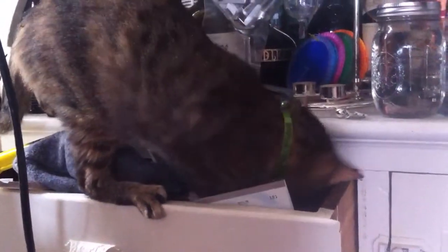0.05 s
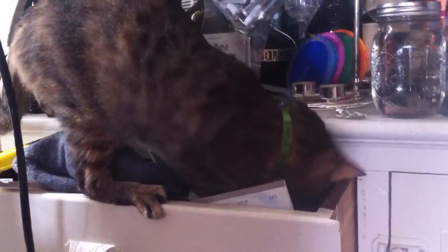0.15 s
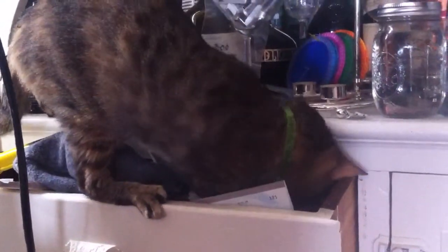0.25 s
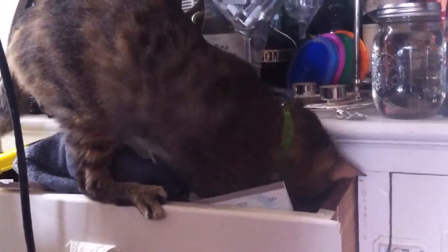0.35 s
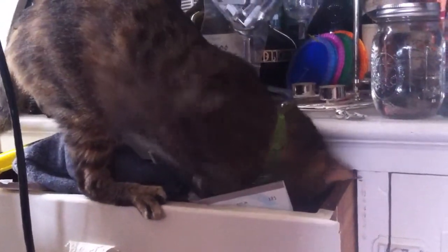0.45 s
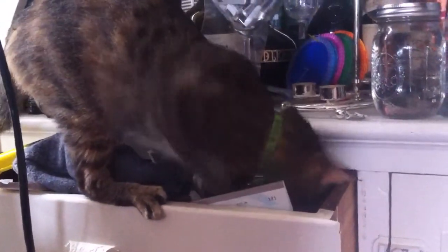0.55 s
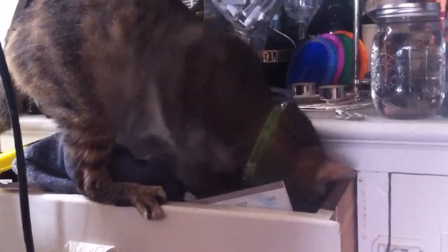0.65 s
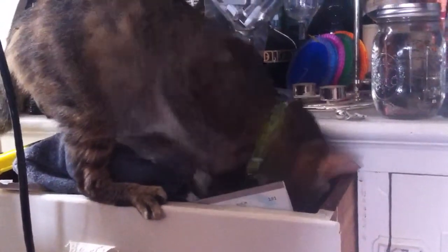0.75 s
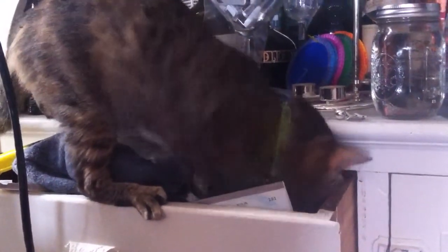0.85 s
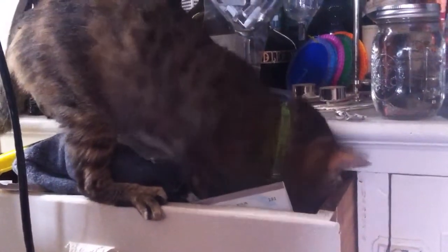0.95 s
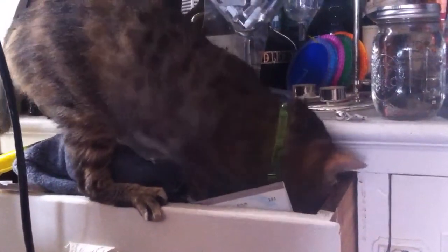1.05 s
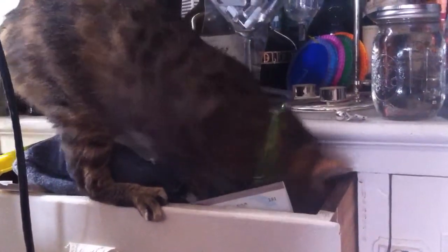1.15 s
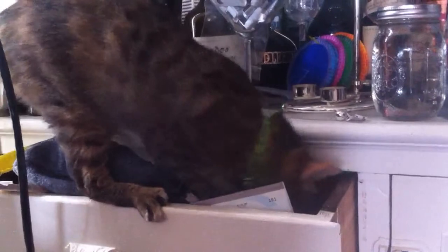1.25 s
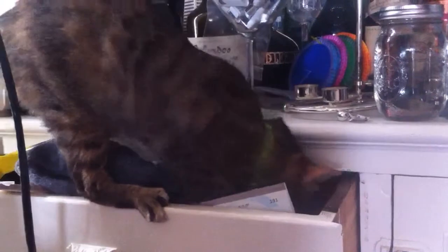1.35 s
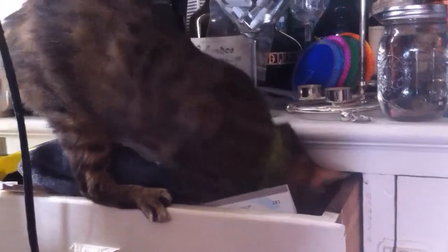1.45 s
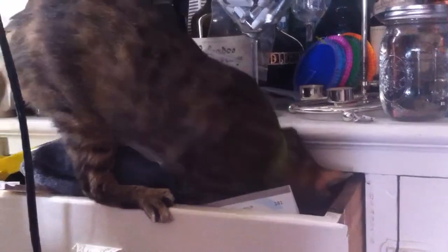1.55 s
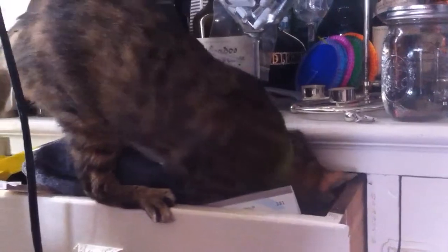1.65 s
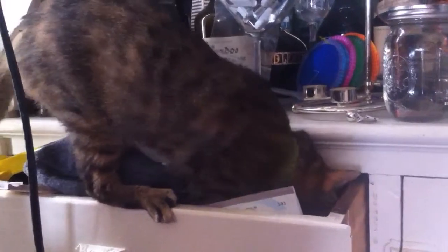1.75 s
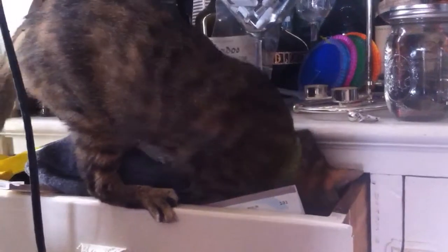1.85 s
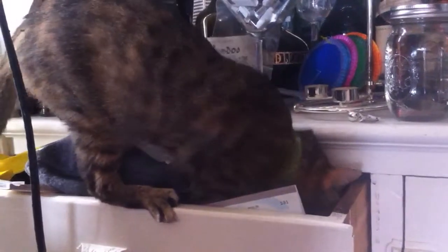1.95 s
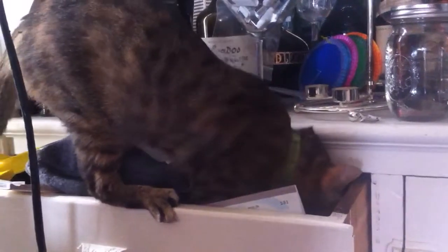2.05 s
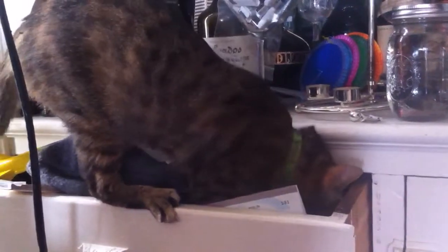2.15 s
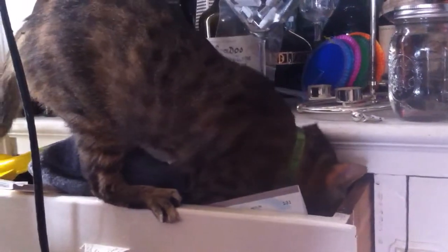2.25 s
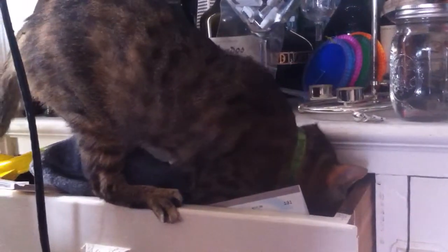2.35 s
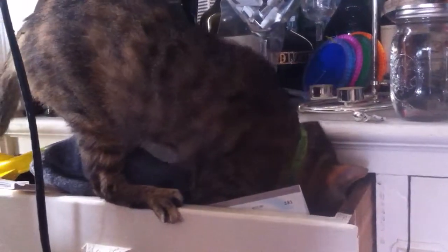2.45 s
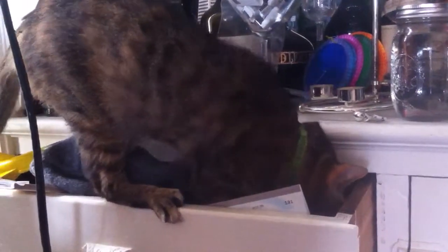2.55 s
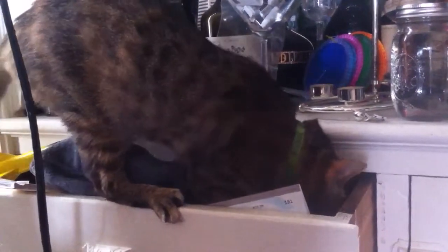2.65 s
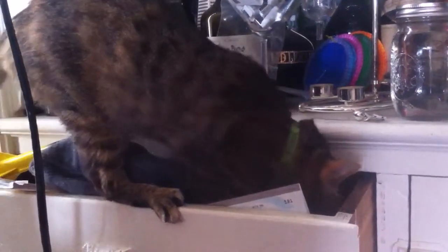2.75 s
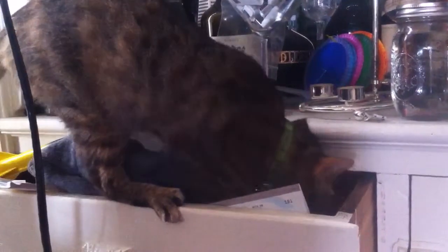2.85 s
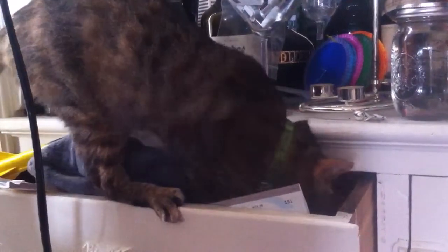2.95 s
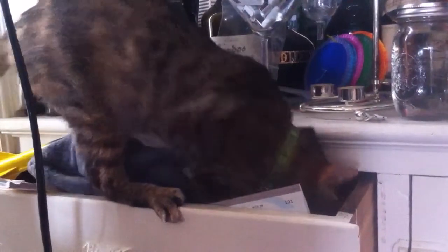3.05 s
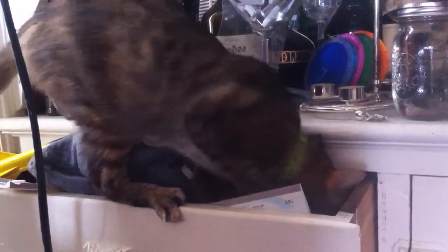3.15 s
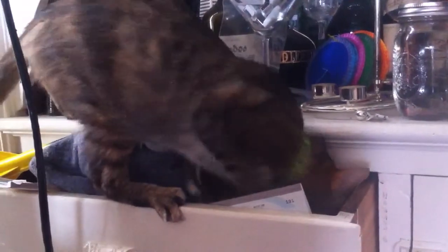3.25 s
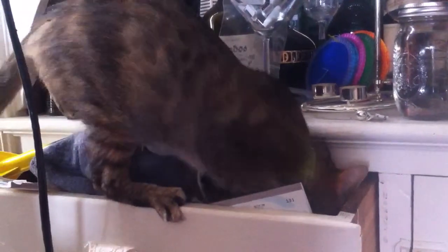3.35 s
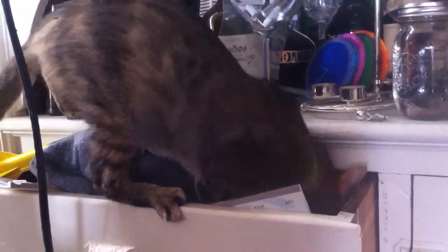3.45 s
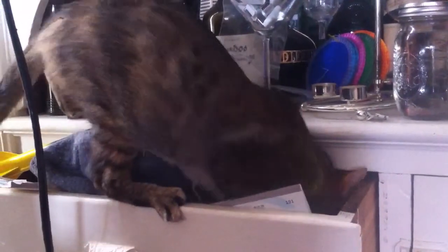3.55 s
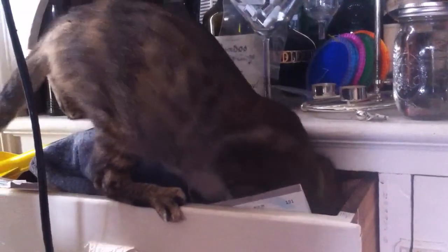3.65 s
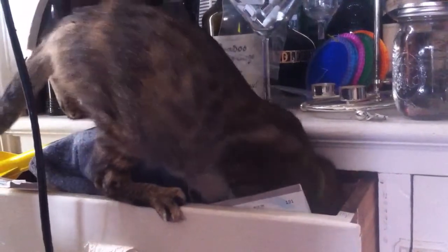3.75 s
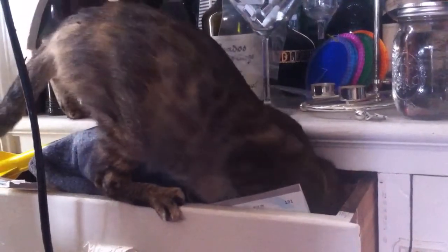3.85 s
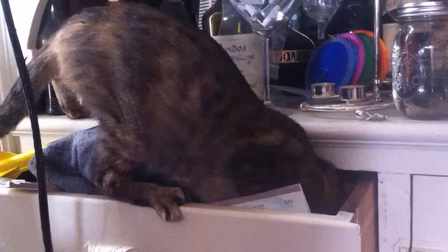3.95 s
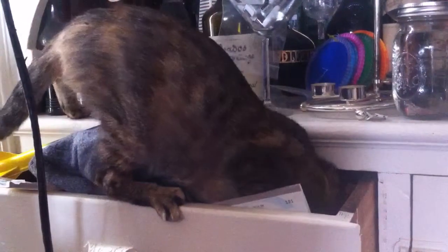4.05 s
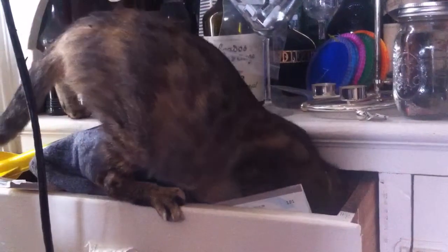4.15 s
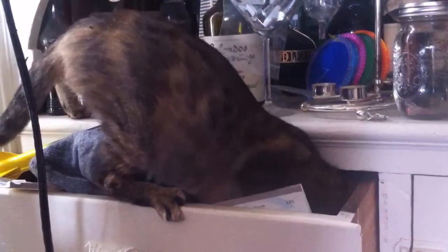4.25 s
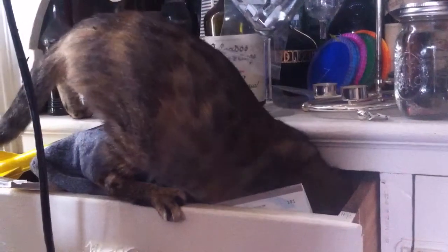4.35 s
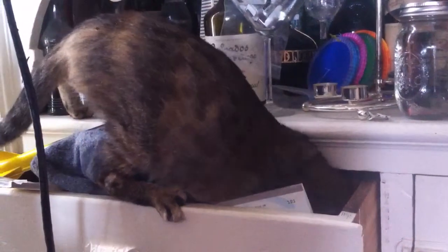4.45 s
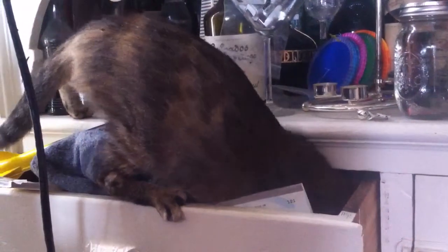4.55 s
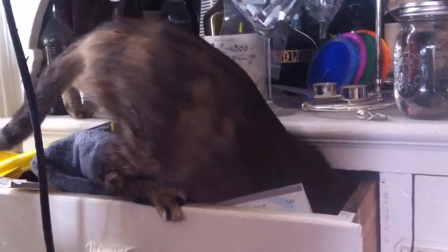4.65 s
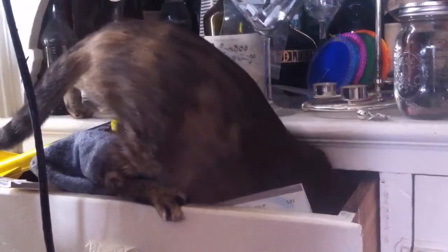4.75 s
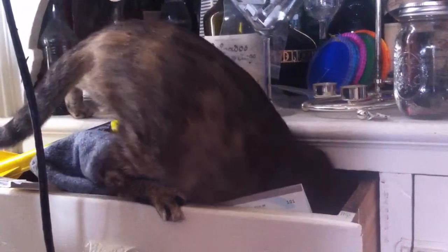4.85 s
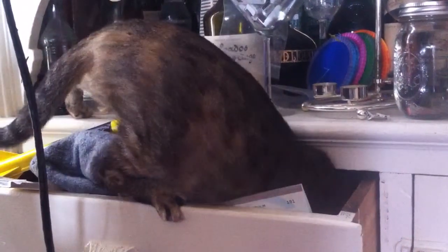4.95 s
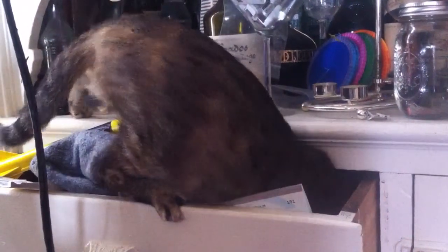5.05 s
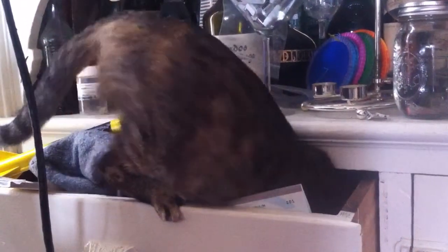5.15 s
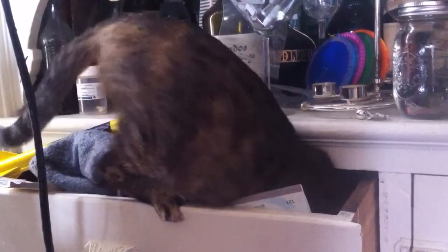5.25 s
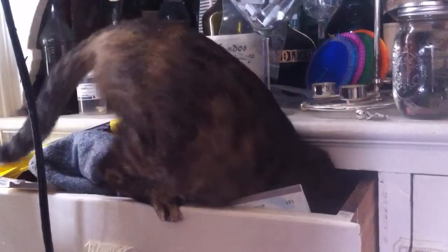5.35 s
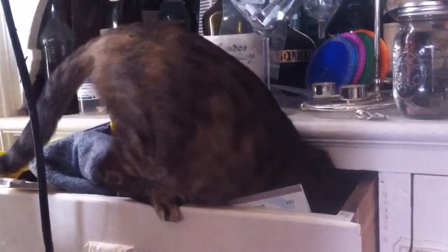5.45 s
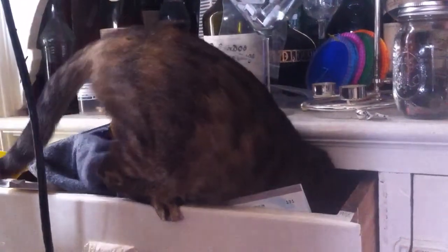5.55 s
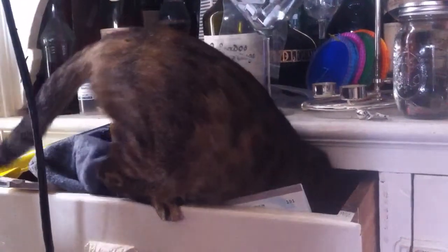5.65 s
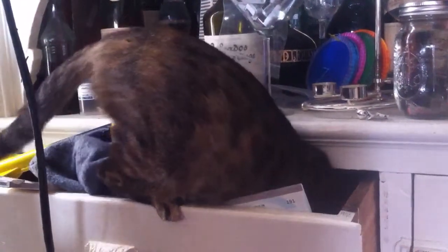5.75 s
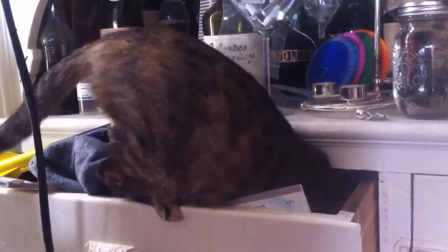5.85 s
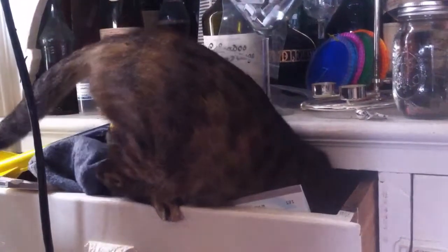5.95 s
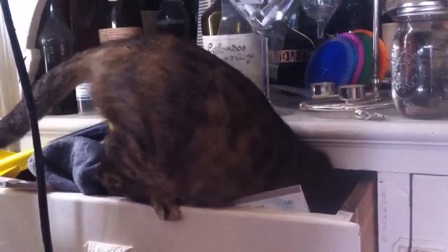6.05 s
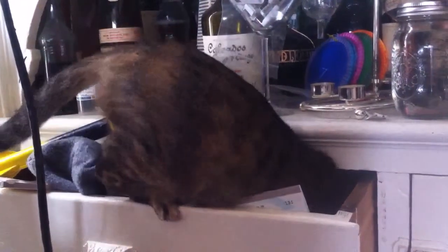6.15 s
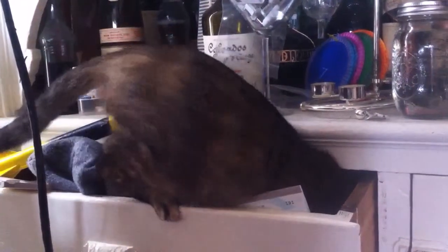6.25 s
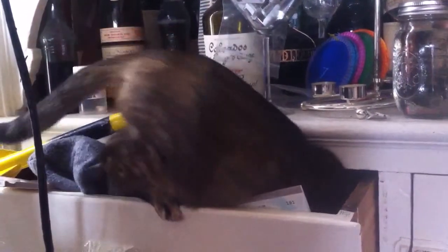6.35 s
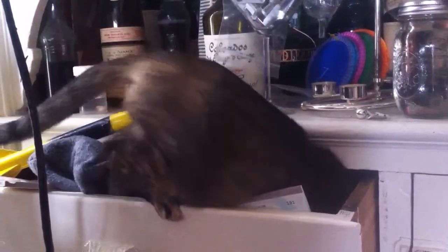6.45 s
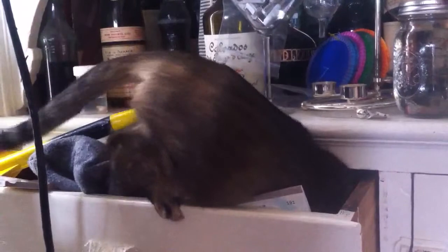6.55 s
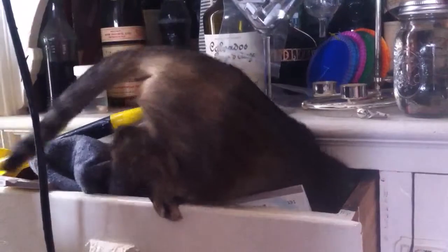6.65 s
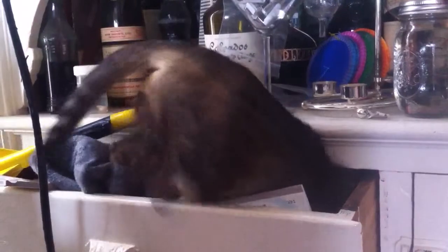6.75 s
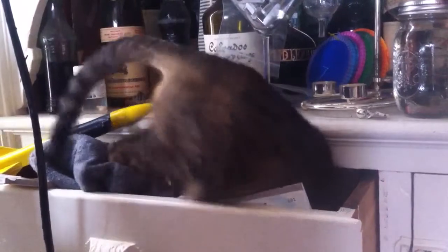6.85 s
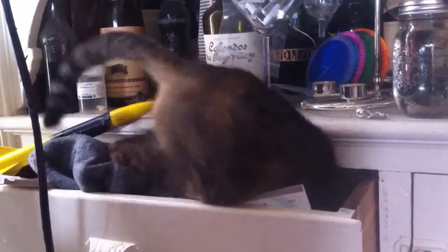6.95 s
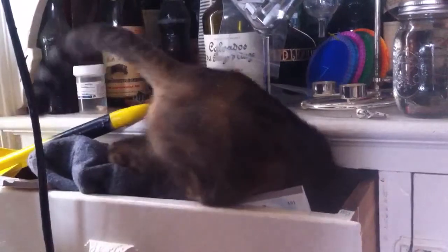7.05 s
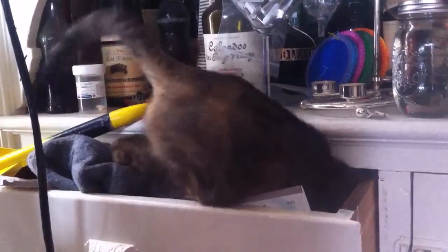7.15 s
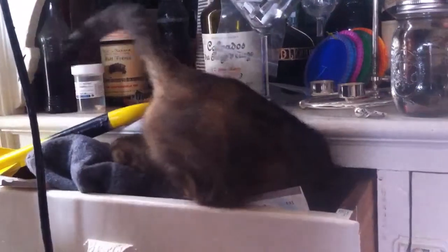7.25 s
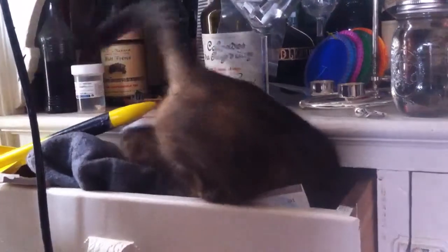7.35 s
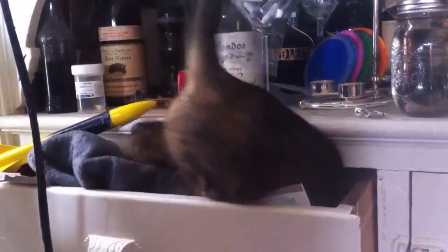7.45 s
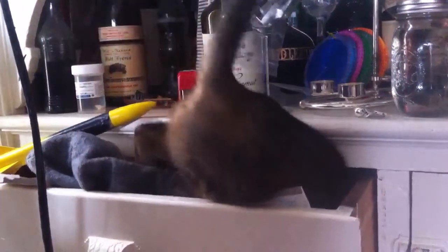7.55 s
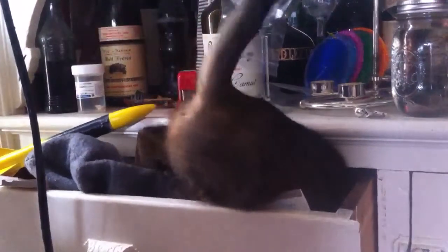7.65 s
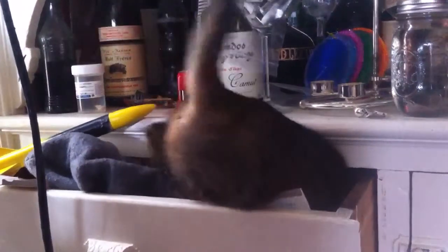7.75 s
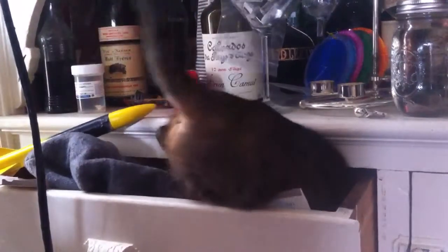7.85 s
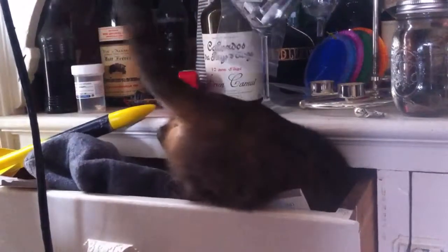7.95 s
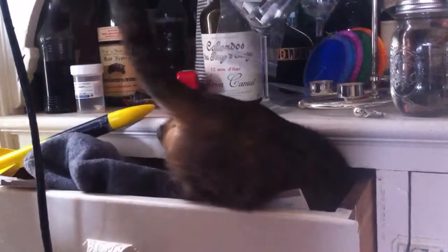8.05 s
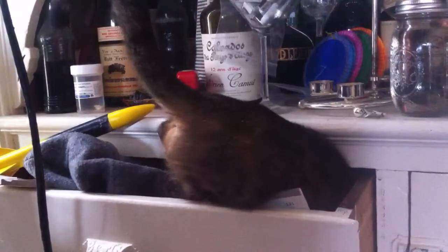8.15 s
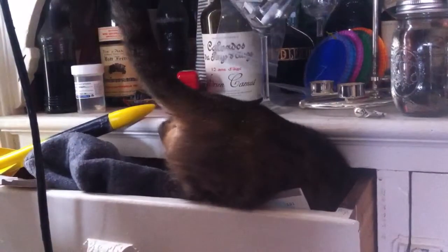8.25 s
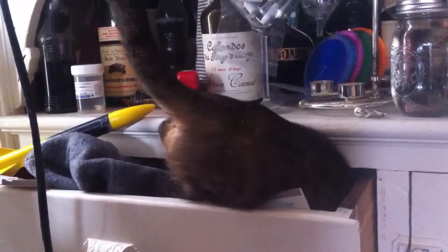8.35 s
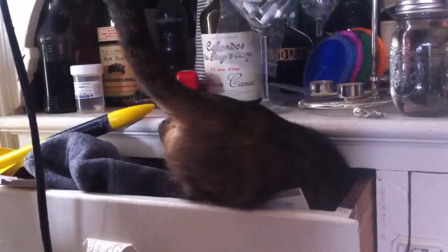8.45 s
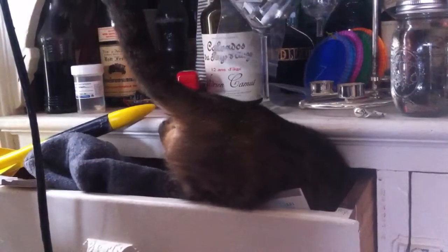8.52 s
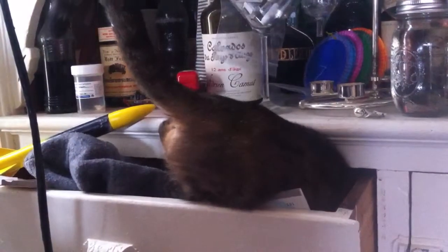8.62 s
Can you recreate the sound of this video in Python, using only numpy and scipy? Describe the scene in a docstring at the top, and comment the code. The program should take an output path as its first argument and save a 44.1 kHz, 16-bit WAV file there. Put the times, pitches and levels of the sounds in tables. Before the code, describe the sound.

Busy paper rustling and claw scratches in a drawer, a bouncing wooden knock, a quiet lull, then muffled paw thumps as a cat climbs in.

```python
"""In a quiet room with a humming appliance, a cat digs in an open wooden drawer of papers and cloth, then climbs in.
Claws and drags are bursts of paper noise that also shake two resonant panels; something hard knocks and bounces.
Soft paws thump the resonant drawer bottom, a few times early and most often near the end.
Uneven noise makes the rustle and creak, a wavering sine over coloured noise the hum and air;
decaying noise makes the room's answer to the contacts."""
import sys
import numpy as np
from scipy import signal
from scipy.fft import rfft, irfft, next_fast_len
from scipy.io import wavfile
from scipy.ndimage import map_coordinates

SR = 44100
rng = np.random.default_rng(int(sys.argv[2]) if len(sys.argv) > 2 else 0)


def store_pcm(level_fs):
    """Save levels as 16-bit WAV."""
    pcm = np.round(np.clip(level_fs, -1, 1) * 32767).astype(np.int16)
    wavfile.write(sys.argv[1], SR, np.atleast_2d(pcm).T)


N = 382947  # samples

# In the event tables, levels are nominal: each layer adds its own offset in dB.
# Paper and creak under the strokes. Each row: time in seconds, paper level in dB, panel creak level in dB.
STIRRING = [(0, -46, -56.5), (.3, -66.5, -59), (.5, -46, -58.5), (.8, -62, -69), (1.0, -57, -54.5),
            (1.3, -60, -57.5), (1.8, -79, -66.5), (2.3, -66, -61), (3.1, -56.5, -59.5), (3.2, -74, -74),
            (3.9, -82, -71), (4.5, -79, -65.5), (4.8, -86, -77), (5.8, -81, -81), (6.1, -72, -66.5),
            (6.5, -77.5, -71.5), (7.3, -68, -65), (7.55, -69, -63), (8.1, -79, -78), (8.68, -86, -71)]
# Sliding paper and fur. Each row: frequency in Hz, relative density in dB per Hz.
SLIDE_SPECTRUM = [(410, -14), (700, -11.5), (875, -11), (1330, -5), (2100, -3.5), (2430, -3), (9600, -18.5),
                  (16000, -64)]
# Crackling paper. Each row: frequency in Hz, relative density in dB per Hz.
PAPER_SPECTRUM = [(500, -9), (1000, 4.5), (1700, 6.5), (2500, 5), (4000, 2), (6000, -5.5), (9000, -13)]
# Fizz of dry edges. Each row: frequency in Hz, relative density in dB per Hz.
EDGE_SPECTRUM = [(3000, -25), (5000, 0), (6500, 0), (9000, -3), (13000, -8.5), (16500, -18)]
# Resonances of the side panel. Each row: centre in Hz, width in Hz, strength in dB.
SIDE_PANEL = [(482, 160, -8), (539, 79, -2.5), (612, 18, -3.5), (689, 75, -1), (800, 25, 1)]
# Resonances of the back panel. Each row: centre in Hz, width in Hz, strength in dB.
BACK_PANEL = [(815, 47, -3), (873.6, 44, 3), (1048, 103, -3)]
# Resonances of the drawer bottom. Each row: centre in Hz, width in Hz, strength in dB.
BOTTOM_BOARD = [(140, 17, -20), (172, 16, 12), (240, 41, 16), (350, 160, 14), (445, 115, -4)]
# Room air and microphone hiss. Each row: frequency in Hz, relative density in dB per Hz.
AIR_SPECTRUM = [(25, -22), (60, -19), (90, -14.5), (130, -5), (200, 7), (260, 0), (400, -3), (750, -8.5),
                (1200, -12), (1600, -16.5), (3000, -20), (8000, -23), (16000, -25)]
# Claws flicking paper. Each row: start in seconds, level in dB, share in the panels in dB, treble in dB,
# colour in Hz.
CLAW_FLICKS = [(.02, -36, -9, -7.5, 4850), (.07, -32, -5, -4.5, 2240), (0.208, -48.5, 3, -24, 1560),
               (0.308, -39.5, -20, -3, 1370), (.422, -25.5, -8.5, -5.5, 4370), (.476, -41.5, 1, -2, 3230),
               (0.529, -30.5, -10, -4, 3440), (.772, -43.5, -4.5, -2.5, 5030), (.851, -44.5, 2, 0.5, 1180),
               (0.927, -36.5, -25, -5.5, 2610), (.982, -29.5, -14, -11.5, 2320),
               (1.034, -26.5, -11, -4, 2400), (1.186, -39, 2.5, -13, 1650), (1.224, -33, -7.5, -11.5, 1210),
               (1.324, -43, -6, -12, 2150), (1.357, -38.5, -12, -10, 4050), (1.413, -30, -3, -5.5, 1680),
               (1.474, -27.5, -13, -7.5, 4300), (1.495, -39, -3, -4, 2190), (1.628, -32, -5.5, -5, 2670),
               (1.853, -31.5, -5.5, -27, 2900), (2.182, -42, 1, -10, 2320), (2.331, -42, -6, -22, 1830),
               (2.489, -33.5, -9, -4.5, 3070), (2.593, -33, -9, -4.5, 3000), (2.658, -33, -2, -8.5, 1950),
               (2.708, -44.5, -2, -23, 2970), (2.782, -41.5, -5.5, -9, 3100), (2.908, -41, -3, 0, 1350),
               (3.042, -38, -2, -13, 1380), (3.113, -41.5, -8, -2.5, 2140), (3.375, -32, -14, -1, 3520),
               (5.183, -62.5, 5, 8, 1350), (5.932, -59, -10, -5, 2880), (6.07, -65, -6, -1, 2920),
               (6.111, -49, 0.5, -15, 1320), (6.176, -54.5, -7, -18, 1210), (7.093, -54, 1, -4, 2960)]
# Decay of the room. Each row: frequency in Hz, time to fall 60 dB in seconds.
ROOM_DECAY = [(150, 0.8), (600, 0.58), (3000, 0.69), (12000, 0.43)]
# Paws on the drawer bottom. Each row: start in seconds, level in dB.
PAW_THUMPS = [(0.082, -40), (.425, -39.5), (2.186, -44.5), (6.5, -54.5), (6.588, -51), (6.692, -48.5),
              (6.748, -53.5), (7.136, -29), (7.345, -36.5), (7.379, -44.5), (7.635, -41), (7.74, -33.5),
              (8.068, -42.5)]
# Drags that swell, hold and fade. Each row: start in seconds, level in dB, share in the panels in dB,
# treble in dB, colour in Hz, rise in seconds.
CLAW_DRAGS = [(0.337, -41.5, -1, -15, 1640, 0.0081), (.489, -43, -23, -3.5, 2470, 0.0069),
              (.615, -42.5, -5, -6, 2520, 0.0059), (.636, -40, -3, -8, 2780, 0.002),
              (0.882, -42, -8.5, -9, 3520, 0.0067), (.943, -34.5, -19, -22, 2170, 0.0017),
              (1.119, -33.5, -9, -9, 1430, 0.0042), (1.243, -38, -8, -11, 2350, 0.006),
              (1.446, -41, -1, -22, 1180, 0.0095), (2.162, -49, -26, -15, 2580, 0.0066),
              (2.304, -45, -1, -6.5, 1250, 0.0096), (2.389, -41, -5, -10, 3400, 0.0043),
              (2.564, -41, -11, -15, 3030, 0.0061), (2.883, -41, -11.5, -12, 3040, 0.0087),
              (2.997, -42.5, -8.5, -11, 3660, .013), (3.095, -51, -3, -13, 1350, .004),
              (3.294, -55.5, -6, -3, 4850, 0.011), (3.325, -52.5, -4, -11, 3570, 0.0075),
              (3.66, -58, 3, -15, 1210, 0.0059), (3.73, -57.5, -2, -12, 1210, 0.0069),
              (4.334, -58, 5, -23, 1210, 0.0034), (4.55, -69, -4, 3, 1210, .0058),
              (6.46, -61.5, -3, -8, 2860, .0028), (6.846, -52.5, -5.5, 5, 2700, 0.011),
              (7.057, -56, -1, -14, 1410, 0.014), (7.289, -53, -1, -9, 1250, 0.0067),
              (7.609, -40, 0.5, -10, 3850, 0.006), (7.629, -31, -3, -11, 1580, 0.0025),
              (7.657, -49, -4, -12, 2200, .006)]
# Loose things knocking on wood. Each row: start in seconds, crack level in dB, side panel relative to it in dB,
# back panel relative to it in dB.
WOOD_KNOCKS = [(.371, -40, 4.5, 1.5), (1.375, -59, 15.5, -10), (1.42, -47, 12, -6), (1.673, -42, -3, 0.5),
               (1.693, -37.5, -7, 0), (1.8, -64.5, 18.5, 8), (1.889, -49, 8.5, 9), (1.9, -48.5, 7, 11),
               (1.935, -34, -15, 2), (1.941, -44, -6, 14.5), (1.96, -43.5, 15, 11), (1.975, -50, -2, -1),
               (1.991, -34.5, -10, 2.5), (2.021, -54, 15, -6), (2.047, -36.5, 5.5, 11),
               (2.381, -40, -4, 2.5), (3.355, -29, 6, 3), (3.389, -36, 18.5, 3), (3.409, -36.5, -1, 7.5),
               (3.449, -35, 9, 7), (3.477, -53, 7, 19.5), (3.483, -52.5, 25, 3), (3.543, -47, 9.5, -9),
               (3.892, -59.5, 5, 4), (4.029, -55, 7, 9.5), (4.277, -65, 4, 11), (4.408, -65, 7, 12),
               (4.441, -56, 6, 11), (4.479, -64, 18.5, 17.5), (4.73, -68, 23, 21), (4.897, -64, 14.5, 14),
               (6.012, -72, 15, 0), (6.224, -58.5, -3, 6), (6.275, -62, 10, 6), (7.137, -49, 14, 6),
               (7.347, -53, 15, 7)]


def amp(db):
    """Decibel law: the amplitude gain of a level in dB."""
    return 10 ** (np.asarray(db) / 20)


def unit(x):
    """Normalisation of power: x scaled to rms 1."""
    return x / np.sqrt(np.mean(x ** 2) + 1e-20)


def along(points, hz):
    """Interpolation of (Hz, value) points on a logarithmic frequency axis."""
    f, v = np.transpose(points)
    return np.interp(np.log(hz + 1), np.log(f + 1), v)


def wobble(rate):
    """Band-limited fluctuation: a smooth random curve with rate knots a second."""
    knots = rng.standard_normal(int(N * rate / SR) + 4)
    return map_coordinates(knots, [np.arange(N) * rate / SR])


def filtered(x, response):
    """Linear filtering: the spectrum of x times a complex response of frequency."""
    m = next_fast_len(N + SR // 2)
    return irfft(rfft(x, m) * response(np.fft.rfftfreq(m, 1 / SR)), m)[..., :N]


def noise(spectrum):
    """Spectral shaping: white noise coloured by the spectrum, at rms 1."""
    return unit(filtered(rng.standard_normal(N), lambda hz: amp(along(spectrum, hz))))


def body(modes, hz, width_hz):
    """Modal superposition: resonances struck at one spot, radiated in a band around hz."""
    def peak(f, centre, width):
        return 1j * f * width / (centre * centre - f * f + 1j * f * width)

    return lambda f: peak(f, hz, width_hz) * sum(amp(db) * peak(f, c, w) for c, w, db in modes)


def bursts(s, db, rise, t60, hold=0):
    """Exponential decay: summed envelopes rise, hold for a share of the rise, then die away."""
    out, t = np.zeros(N + SR), np.arange(SR // 3) / SR
    events = np.broadcast(s, db, np.clip(rise, .0002, .04), np.clip(t60, .001, .5))
    for at, level, up, down in events:
        decay_db = 60 * np.maximum(t - up * (1 + hold), 0) / down
        out[round(at * SR):][:len(t)] += amp(level - decay_db) * np.minimum(t / up, 1)
    return out[:N]


def random_ticks(per_second, spread_db, t60):
    """Impulsive excitation: randomly timed ticks of random size, each with an exponential tail."""
    ticks = (rng.random(N) < per_second / SR) * amp(spread_db * rng.exponential(size=N))
    tail = amp(-60 * np.arange(SR // 20) / SR / t60)
    return signal.fftconvolve(ticks, tail)[:N]


def rustle():
    """Frictional noise: paper slides unevenly, small creases snap, and the panels creak."""
    s, paper_db, creak_db = np.transpose(STIRRING)
    t = np.arange(N) / SR
    # paper settles with each claw, wood with each knock or thump
    claws = np.transpose(CLAW_FLICKS)[:2]
    hits = np.transpose([row[:2] for row in WOOD_KNOCKS + PAW_THUMPS])
    settle_rise_s, settle_t60_s = 0.0067, 0.29
    paper_level = amp(np.interp(t, s, paper_db)) + bursts(*claws, settle_rise_s, settle_t60_s) * amp(-28.5)
    creak_level = amp(np.interp(t, s, creak_db)) + bursts(*hits, settle_rise_s, settle_t60_s) * amp(-25)

    lumps = amp(1.5 * wobble(30) + 1.5 * wobble(250))
    snaps = random_ticks(90, 2.6, 0.063)
    paper = paper_level * unit((lumps + 1.3 * snaps) * noise(SLIDE_SPECTRUM))
    corners = random_ticks(45, 6.5, 0.006)  # dry corners catch
    paper += paper_level * amp(-12.5) * unit(corners * noise(PAPER_SPECTRUM))

    panels = body([(343, 320, 4.3)] + SIDE_PANEL + BACK_PANEL, 345, 1120)
    creak = filtered(lumps * rng.standard_normal(N), panels)
    return paper + creak_level * unit(creak)


def appliance():
    """Frequency modulation: one low tone wavers slightly, over the broadband air of the room."""
    hum_hz, hum_db, air_db = 207.6, -61, -62.5  # mean pitch; levels about which each layer drifts
    phase = 2 * np.pi * np.cumsum(hum_hz + 0.65 * wobble(3)) / SR
    hum = amp(hum_db + 0.32 * wobble(1.96)) * np.sqrt(2) * np.sin(phase)
    air = amp(air_db + 0.74 * wobble(1.01)) * noise(AIR_SPECTRUM)
    return hum + air


def board(panel, s, blow_db, contact, rub):
    """Forced vibration: short blows of given peak level and rubbing noise under envelope rub drive a board."""
    one = np.abs(filtered(bursts(0, 0, contact / 4, contact), panel)).max()  # peak of one blow
    white = rng.standard_normal(N)
    blows = bursts(s, blow_db, contact / 4, contact) / one
    return filtered(blows + rub * white / filtered(white, panel).std(), panel)


def contacts(s, db, side_db, back_db, treble_db, hz, rise, t60, blow_db, rub_db, hold, tint_db):
    """Stick-slip friction: each contact crackles paper in its own colour, fizzes on edges and shakes two panels."""
    grain = amp(3.4 * wobble(400) + 1.04 * wobble(110))  # catching and slipping along the fibres
    out = bursts(s, db - 7.0, rise, t60, hold) * unit(grain * noise(PAPER_SPECTRUM))

    # noise bands weighted by how near they lie to the contact's colour
    for centre in (1320, 1704, 2220, 3250, 4400):
        share = np.clip(1 - np.abs(np.log(hz / centre)) / 0.39, 1e-3, 1)
        band = [(0.65, -40), (0.86, -6), (1, 0), (1.044, -6), (1.84, -40)]
        sheet = noise([(ratio * centre, band_db) for ratio, band_db in band])
        level = db + tint_db + 10 * np.log10(share)
        out += bursts(s, level, rise, t60, hold) * unit(grain * sheet)

    fizz = unit(amp(1.7 * wobble(500)) * noise(EDGE_SPECTRUM))
    out += bursts(s, db + treble_db - 5.5, rise, 0.78 * t60, hold) * fizz

    side, back = body(SIDE_PANEL, 576, 263), body(BACK_PANEL, 900, 520)
    for panel_db, panel in ((side_db, side), (back_db, back)):
        rub = grain * bursts(s, db + panel_db + rub_db, rise, 0.95 * t60, hold)
        out += board(panel, s, db + panel_db + blow_db, 0.0012, rub)
    return out


def claws():
    """Impulsive friction: claws flick the paper sharply and tap the wood."""
    s, db, wood_db, treble_db, hz = np.transpose(CLAW_FLICKS)
    return contacts(s, db, wood_db, wood_db, treble_db, hz, rise=0.0011, t60=0.077,
                    blow_db=-3, rub_db=-10.5, hold=0, tint_db=-9)


def room(x):
    """Reverberation: each frequency dies at its own speed, with a new random tail every sixth of a second."""
    out, hop = np.zeros(N + 2 * SR), SR // 6
    for i in range(0, N, hop):
        hz, t, z = signal.stft(rng.standard_normal(SR // 2), SR, nperseg=256)
        decay = amp(-60 * t / along(ROOM_DECAY, hz)[:, None])
        tail = signal.istft(z * decay, SR, nperseg=256)[1]
        wet = signal.fftconvolve(x[i:i + hop], tail / np.linalg.norm(tail))
        out[i + 200:][:len(wet)] += wet  # 200 samples of delay
    return out[:N]


def paws():
    """Damped impact: padded paws give the bottom board a soft blow and a fading rumble, the pads muting the top."""
    s, db = np.transpose(PAW_THUMPS)
    sink_s = 0.0039  # the pad sinks in before the weight lands

    def bottom(f):
        pad_lowpass = 1 / (1 + 1j * f / 450)
        bass_cut = (1j * f / (110 + 1j * f)) ** 2
        return body(BOTTOM_BOARD, 230, 260)(f) * pad_lowpass * bass_cut

    rumble = bursts(s, db - 7.5, 0.0044, 0.21)
    return board(bottom, s + sink_s, db - 1.0, 0.0063, rumble)


def drags():
    """Sustained friction: drags swell, hold and mostly rub; slower ones also fade more slowly."""
    s, db, wood_db, treble_db, hz, rise = np.transpose(CLAW_DRAGS)
    fade = 0.068 + 7.3 * rise  # seconds to fall 60 dB
    return contacts(s, db, wood_db, wood_db, treble_db, hz, rise, fade,
                    blow_db=-10, rub_db=-8.5, hold=1.0, tint_db=-12.0)


def knocks():
    """Hard impact: loose things knock the wood; a weaker crack rises more slowly, with more treble relative to it."""
    s, db, side_db, back_db = np.transpose(WOOD_KNOCKS)
    below_db = db.max() - db  # below the strongest crack
    treble_db = -11.5 + 0.2 * below_db
    rise = 0.0017 * amp(0.21 * below_db)  # seconds
    return contacts(s, db, side_db, back_db, treble_db, 1730, rise, t60=0.084,
                    blow_db=1.0, rub_db=-19.5, hold=0, tint_db=-12.5)


def scene():
    """Superposition: direct contacts, the room's answer to them, the rustle and the appliance."""
    hits = claws() + knocks() + drags() + paws()
    return (hits + amp(-9.0) * room(hits) + rustle() + appliance())[None]


def record(dry):
    """Band limitation: the microphone drops deep bass and keeps nothing above its upper limit."""
    top_hz, bass_hz = 15870, 40
    return filtered(dry, lambda hz: (hz < top_hz) * (1j * hz / (bass_hz + 1j * hz)))


dry = scene()
out = record(dry)
store_pcm(out)
```